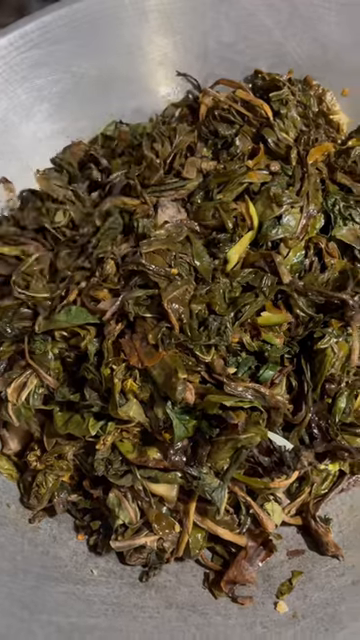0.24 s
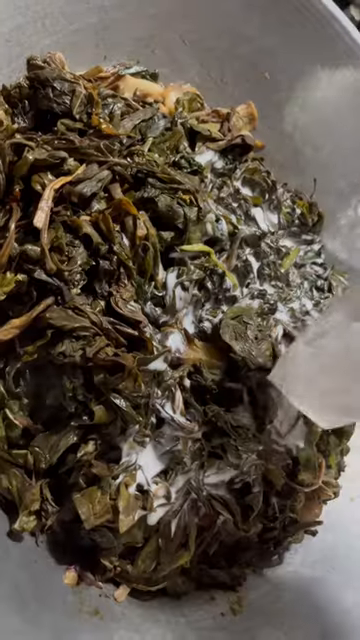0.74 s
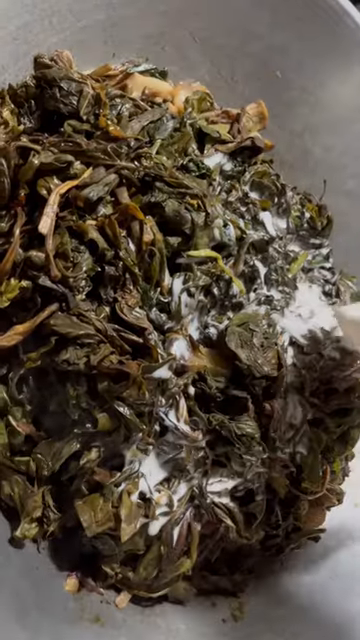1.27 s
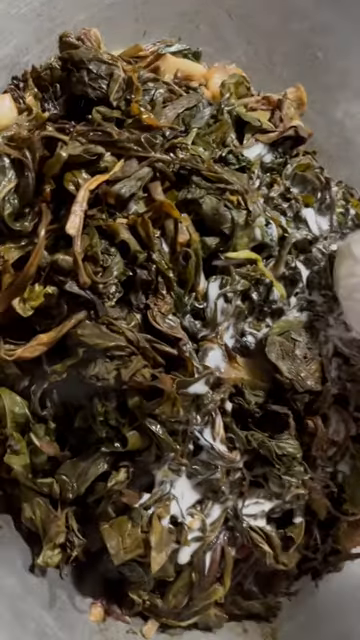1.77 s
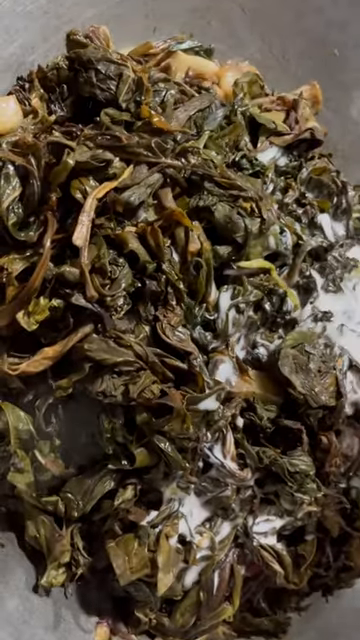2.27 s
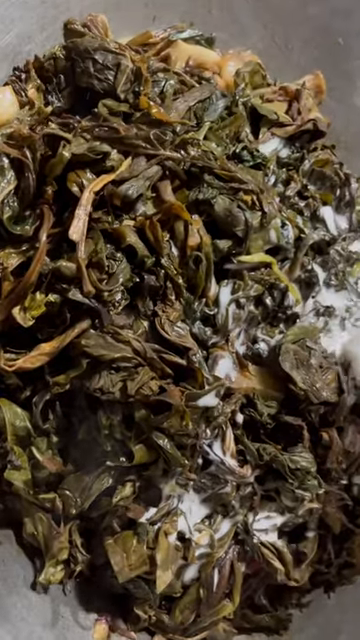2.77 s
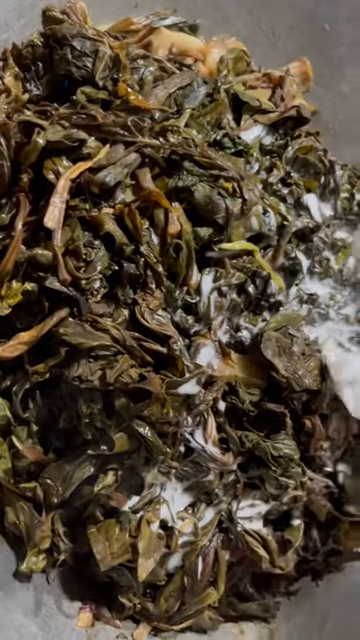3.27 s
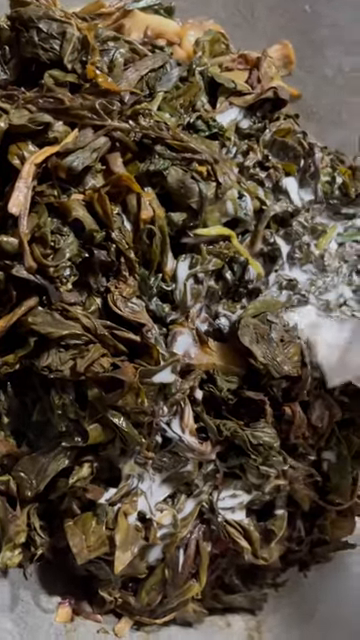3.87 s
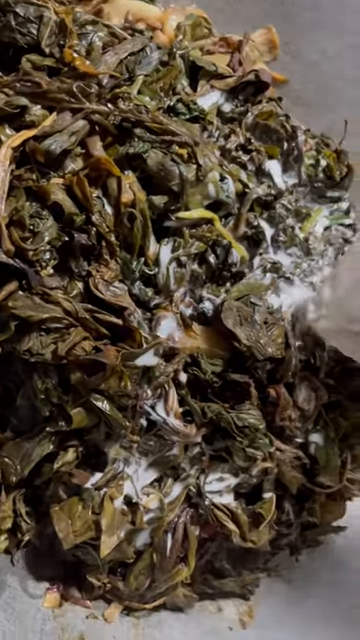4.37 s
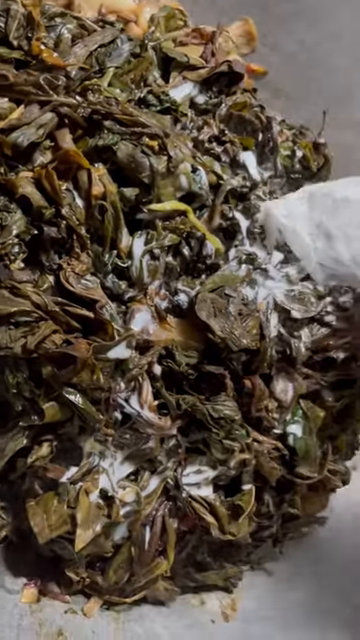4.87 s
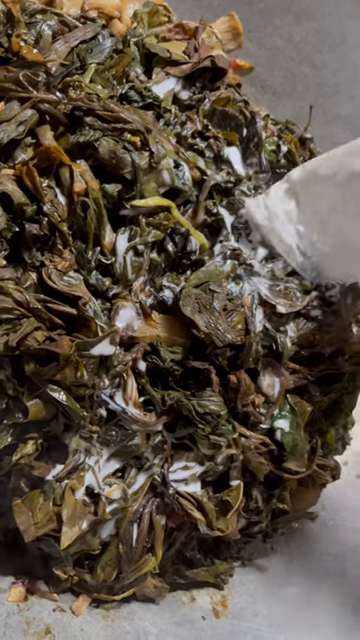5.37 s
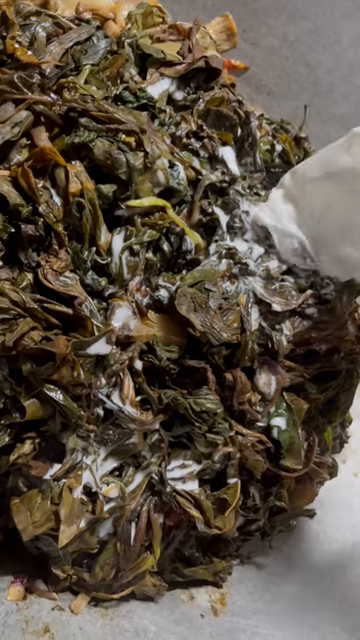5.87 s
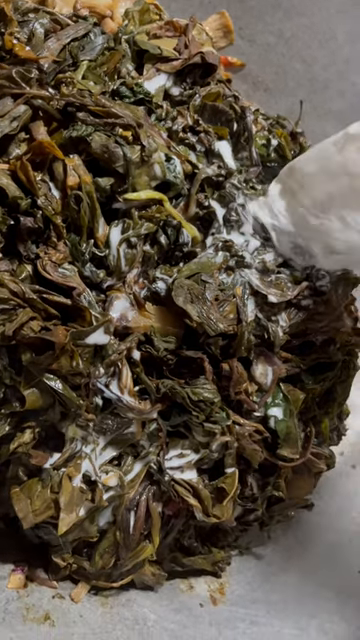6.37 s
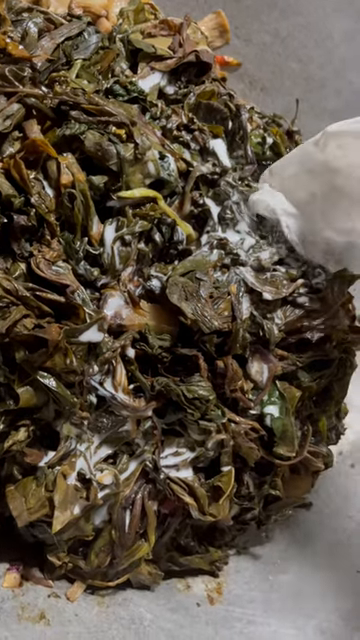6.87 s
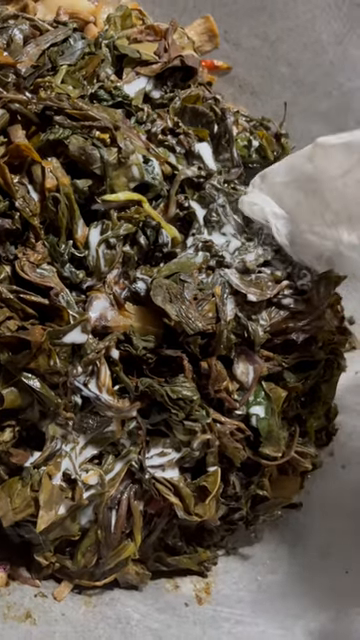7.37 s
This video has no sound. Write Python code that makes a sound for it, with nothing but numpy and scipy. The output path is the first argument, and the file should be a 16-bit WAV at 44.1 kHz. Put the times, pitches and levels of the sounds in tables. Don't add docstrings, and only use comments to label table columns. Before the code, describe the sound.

Wet leafy greens sizzle fiercely in a wide metal pan, a bright dense hiss full of crackles, sharp pops and a few faint utensil knocks.

```python
import sys
import numpy as np
from scipy import signal
from scipy.fft import rfft, irfft, next_fast_len
from scipy.io import wavfile

SR = 44100
rng = np.random.default_rng(int(sys.argv[2]) if len(sys.argv) > 2 else 0)


def gain_from_decibels(decibels):
    exponent = np.asarray(decibels, float) / 20
    return 10 ** exponent


def unload_wav(signal):
    wavfile.write(
        sys.argv[1],
        SR,
        np.round(np.clip(np.atleast_2d(signal).T, -1, 1) * 32767).astype(np.int16),
    )


N = 336483

# frequency_hz, level_db (per Hz)
STEAM_SPECTRUM = [(180, -45), (350, -38.5), (600, -32.5), (1100, -24.5), (1700, -17), (2500, -12.5),
                  (3200, -7), (4000, -5), (5000, -2), (6800, -0.5), (9000, -0.4), (11800, .5),
                  (13500, -0.5), (15500, -4)]
# centre_s, change_db, length_s
FLAME_DRAUGHTS = [
    (.4, -2, .4),
    (1.3, -5, 0.21),
    (1.9, -7, 0.2),
    (2.42, -4, .08),
    (2.92, -5, .16),
    (3.39, -6, 0.11),
    (5.1, -5.5, .3),
    (5.53, -7, 0.13),
    (6.44, -4, 0.19),
    (7.09, -4, .12),
]


def rms_one(x):
    return x / np.sqrt(np.mean(x ** 2) + 1e-20)


def at_hz(points, hz):
    point_hz, point_db = np.array(points)[:, 0], np.array(points)[:, 1]
    return gain_from_decibels(np.interp(np.log(hz + 1), np.log(point_hz), point_db))


def coloured(x, spectrum):
    size = next_fast_len(N + 4096)
    gain = at_hz(spectrum, np.fft.rfftfreq(size, 1 / SR))
    return irfft(rfft(x, size) * gain, size)[:N]


def filtered(x, order, hz, kind):
    return signal.sosfilt(signal.butter(order, hz, kind, fs=SR, output="sos"), x)


def drift(rate_hz):
    r = np.exp(-2 * np.pi * rate_hz / SR)
    noise = rng.standard_normal(N + SR)
    return rms_one(signal.lfilter([1], [1, -2 * r, r * r], noise)[SR:])


def swells(rows):
    t = np.arange(N) / SR
    return sum(db * np.exp(-(2 * (t - s) / length) ** 2) for s, db, length in rows)


def ring(clicks, hz, t60):
    r, w = gain_from_decibels(-60 / (t60 * SR)), 2 * np.pi * hz / SR
    return signal.lfilter([0, np.sin(w)], [1, -2 * r * np.cos(w), r * r], clicks + 1e-18)


def patchy(x, patch_db=1.01, per_s=13.0):
    size = next_fast_len(N)
    spectrum = rfft(x, size)
    band = (np.fft.rfftfreq(size, 1 / SR) // 700).astype(int)
    out = np.zeros(N)
    for k in range(23):
        out += gain_from_decibels(patch_db * drift(per_s)) * irfft(spectrum * (band == k), size)[:N]
    return out


def burst(centre_hz, echo, echo_s, tilt_hz=4500, mid_hz=9500):
    hz = np.fft.rfftfreq(1024, 1 / SR)
    tilt = np.exp((centre_hz - mid_hz) / tilt_hz * (np.maximum(hz, 4500) - mid_hz) / 4000)
    pulse = irfft(at_hz(STEAM_SPECTRUM, hz) * tilt * (hz < 15600))
    bounce = irfft(rfft(pulse) * echo * np.exp(-2j * np.pi * hz * echo_s))
    centred = np.roll(pulse + bounce, 512)
    return -centred / pulse[0] * np.hanning(1024)


def crackle(activity_db, per_s=3500, spread_db=3.5, size_db=-31, ceiling_db=-10.2):
    born = rng.random(N) < per_s * gain_from_decibels(activity_db) / SR
    sizes = gain_from_decibels(np.minimum(size_db + spread_db * rng.exponential(1, N), ceiling_db))
    dealt, out = rng.integers(0, 16, N), np.zeros(N)
    for k, (pitch, echo, lag) in enumerate(rng.random((16, 3))):
        centre_hz = 7200 + 4200 * (k + pitch) / 16
        shape = burst(centre_hz, 1.48 * (echo - .5), .0001 + 0.000673 * lag)
        out += signal.oaconvolve(born * sizes * (dealt == k), shape)[512:512 + N]
    return out


def fizz(per_s=1500, spread_db=0.0, cycles=53.0):
    born = rng.random(N) < per_s / SR
    sizes = gain_from_decibels(spread_db * np.minimum(rng.exponential(1, N), 4)) * born
    dealt, rings = rng.integers(0, 36, N), np.zeros(N)
    for k, hz in enumerate(np.geomspace(600, 15200, 36)):
        rings += hz * ring(sizes * (dealt == k), hz, cycles / hz)
    hollow = filtered(rings, 2, 4000, "high")
    return rms_one(coloured(rings * 0.27 + hollow, STEAM_SPECTRUM))


def sizzle():
    # time_s, level_db
    heat = [
        (0.0, -24.5),
        (3.06, -26),
        (3.23, -26),
        (3.8, -25),
        (6.5, -26.5),
        (6.65, -26),
        (7.59, -25.5),
        (7.63, -27),
    ]
    # centre_s, change_db, length_s
    juice_surges = [(.22, 0.2, .1), (.64, -0.5, 0.22), (.89, .5, 0.09), (1.13, 0.5, .14), (1.34, 0, 0.066),
                    (1.58, -0.8, 0.28), (1.72, 0.5, 0.063), (1.95, 0.5, 0.092), (2.12, -2, 0.047),
                    (2.36, 1, .12), (2.87, 0.3, .1), (3.08, 0.5, 0.065), (3.28, -0.8, 0.11),
                    (3.57, 0.8, .1), (3.9, .9, 0.05), (4.58, -0.5, 0.15), (4.8, 1, 0.05), (5.01, -2, .09),
                    (5.65, 0.2, 0.25), (6.05, -0.5, 0.056), (6.34, -1, .1), (6.5, -1, .07),
                    (6.72, 1.6, 0.09), (6.9, 0, 0.059), (7.0, -0.8, .1), (7.14, 0.9, .07), (7.32, 1.1, .07),
                    (7.55, -1.3, 0.073)]
    heat_s, heat_db = np.transpose(heat)
    level_db = np.interp(np.arange(N) / SR, heat_s, heat_db)
    surge_db = swells(juice_surges)
    spurts_db = 0.25 * drift(22) + .55 * drift(50)

    hiss = rms_one(patchy(coloured(rng.standard_normal(N), STEAM_SPECTRUM))) * gain_from_decibels(-29.5 + spurts_db)
    bed = hiss + crackle(2.4 * spurts_db + 1.1 * drift(25)) + gain_from_decibels(-36.5) * fizz()

    low = signal.sosfiltfilt(signal.butter(3, 4000, fs=SR, output="sos"), bed)
    wet = signal.sosfiltfilt(signal.butter(3, 1800, fs=SR, output="sos"), bed)
    mid_gain = gain_from_decibels(0.2 * surge_db + 1.26 * drift(16) + 0.12 * drift(2.3))
    wet_gain = gain_from_decibels(0.21 * surge_db + 0.17 * swells(FLAME_DRAUGHTS) + 0.58 * drift(4.5))
    return gain_from_decibels(level_db + surge_db + 27.5) * (bed - low + mid_gain * (low - wet) + wet_gain * wet)


def burner(start_db=-67.5, sag_db_per_s=0.48):
    # frequency_hz, level_db (per Hz)
    rumble = [(20, -25), (45, -18), (70, 1), (110, -2), (185, 3), (230, -0.5), (300, 1.5), (400, -1),
              (500, -3.5), (650, -1), (850, -1), (1300, -71)]
    # frequency_hz, rms_db
    hum = [(59.2, -83.5)]
    t = np.arange(N) / SR
    level_db = start_db - sag_db_per_s * t + swells(FLAME_DRAUGHTS)
    out = rms_one(coloured(rng.standard_normal(N), rumble)) * gain_from_decibels(level_db + 0.56 * drift(15))
    for hz, db in hum:
        out += np.sqrt(2) * gain_from_decibels(db) * np.sin(2 * np.pi * hz * t)
    return out


def through_pan(x):
    # frequency_hz, width_hz, boost_db
    pan_sheen = [(445, 18, 6), (648, 24, 5), (763, 22, 5), (1010, 80, 2), (1200, 60, 2.4), (2000, 200, 1.1),
                 (3150, 300, 1), (5130, 140, 2), (6900, 500, .7), (8300, 300, .7)]
    hz = np.geomspace(100, 20000, 3000)
    sheen_db = sum(db / (1 + (2 * (hz - peak_hz) / width) ** 2) for peak_hz, width, db in pan_sheen)
    return coloured(x, np.transpose([hz, sheen_db]))


def drops(per_s=60, size_db=-30, spread_db=4.0, fat_hz=5300, fat_spread_hz=220):
    # time_s, peak_db
    deep_bursts = [(0.1425, -21.2), (0.552, -17.1), (2.0697, -16.5), (2.3461, -21.8), (2.7033, -19.8),
                   (2.769, -19.5), (3.0827, -17.3), (3.3633, -17.4), (3.7947, -21.0), (3.8453, -20.7),
                   (3.9206, -16.3), (4.1198, -20.2), (4.1431, -18.3), (4.3229, -18.5), (4.3725, -20.0),
                   (4.4759, -19.6), (4.5452, -18.9), (4.8908, -21.4), (4.9537, -16), (5.1842, -16.4),
                   (5.4226, -21.2), (5.6581, -17.6), (5.9134, -19), (6.8656, -17.1), (6.9004, -16.8),
                   (7.3072, -19), (7.5901, -19.6)]
    out = np.zeros(N)
    for (s, db), chance in zip(deep_bursts, rng.standard_normal(len(deep_bursts))):
        click = np.zeros(200)
        click[0] = -gain_from_decibels(db + 4)
        at = round(s * SR) - 3
        out[at:at + 200] += ring(click, fat_hz + fat_spread_hz * chance, .0011)
    for hz in np.geomspace(2600, 6200, 6):
        born = rng.random(N) < per_s / 6 / SR
        tail_db = spread_db * np.minimum(rng.exponential(1, N), 2.5)
        sizes = gain_from_decibels(size_db + tail_db + 9 * np.log2(hz / 5000))
        out -= ring(born * sizes, hz, 10.0 / hz)
    return filtered(out + 1e-18, 2, 1500, "high")


def bumps():
    # time_s, peak_db, pitch_hz
    stove_bumps = [(0.073, -56, 301), (0.679, -58, 423), (1.459, -58, 148), (1.699, -61, 339),
                   (2.06, -57, 178), (2.259, -62, 196), (2.552, -56, 196), (2.619, -60, 272),
                   (3.879, -63, 417), (4.229, -61, 374), (4.729, -59, 339), (5.349, -59, 266),
                   (5.609, -63, 178), (5.999, -60, 256), (7.0, -63, 288)]
    out, t = np.zeros(N + 4000), np.arange(4000) / SR
    swell = (t / 0.0061) * np.exp(1 - t / 0.01)
    for (s, db, hz), chance in zip(stove_bumps, rng.standard_normal((len(stove_bumps), 4000))):
        at = round(s * SR)
        out[at:at + 4000] += gain_from_decibels(db - 11) * swell * rms_one(ring(chance, hz, .03))
    return out[:N]


def knocks():
    # time_s, peak_db, thud_db (relative), rattle_t60_s
    strikes = [
        (0.076, -53, -10, .05),
        (.644, -46, -22, 0.14),
        (.871, -44, -22, .04),
        (3.843, -46, -15, 0.04),
        (4.505, -47, -22, 0.032),
        (6.704, -39.5, -21, 0.29),
        (7.307, -48, -26, 0.026),
    ]
    # frequency_hz, level_db, t60_s
    pan_modes = [(800, -13, .02), (1025, -1, .022), (1265, -4, .02), (1540, 0, .03), (1800, -4, .02),
                 (2019, 0, .025), (2330, -2, .02), (2600, -4, .02)]
    out, t = np.zeros(N), np.arange(4000) / SR
    contact, thud = np.zeros(N + 4000), np.zeros(N + 4000)
    for (s, db, thud_db, t60), chance in zip(strikes, rng.standard_normal((len(strikes), 4000))):
        at, touches = round(s * SR), gain_from_decibels(-60 * t / t60) * chance
        contact[at:at + 4000] += gain_from_decibels(db - 22.0) * touches
        thud[at:at + 4000] += gain_from_decibels(db + thud_db + 19) * touches
    for hz, level_db, t60 in pan_modes:
        out += gain_from_decibels(level_db) * ring(contact[:N], hz, t60)
    return filtered(out, 2, 750, "high") + filtered(thud[:N] + 1e-18, 2, [120, 650], "band")


def loud_pops():
    # time_s, peak_db, centre_hz
    lone_pops = [(0.0792, -6.9, 8500), (0.1735, -5.9, 8600), (0.2098, -6.9, 10400), (0.3593, -8.5, 11100),
                 (0.6728, -5.4, 9800), (1.0963, -6.4, 10400), (1.2509, -6.6, 9100), (1.3442, -5.0, 10700),
                 (1.5632, -6.8, 9100), (1.8, -6.4, 9400), (2.0679, -6.3, 11100), (2.2283, -5.5, 9700),
                 (2.4661, -5.5, 11300), (3.0318, -5.9, 10000), (3.0827, -5.1, 7800), (3.5491, -3.3, 8600),
                 (3.586, -3.9, 8800), (3.9021, -6.2, 8700), (3.9206, -6.2, 6500), (4.4113, -5.6, 8800),
                 (4.4756, -6.0, 9600), (4.5216, -7.5, 9300), (4.9293, -5.2, 7400), (4.9537, -6.2, 8100),
                 (5.1842, -4.8, 8700), (5.8186, -4.0, 10200), (5.9134, -8.0, 7600), (6.4112, -7.4, 9700),
                 (7.1422, -7.7, 10600), (7.3072, -8, 7100)]
    out = np.zeros(N + 1024)
    for (s, db, hz), (echo, lag) in zip(lone_pops, rng.random((len(lone_pops), 2))):
        at = round(s * SR)
        pop = gain_from_decibels(db - .2) * burst(hz, .7 * (echo - .5), .0001 + .0004 * lag)
        out[at:at + 1024] += pop[:N + 1024 - at]
    return out[512:512 + N]


def scene():
    mono = through_pan(sizzle() + burner()) + loud_pops() + drops() + knocks() + bumps()
    return np.stack([mono, mono])


def top_cut(x):
    return signal.sosfilt(signal.butter(12, 16780, fs=SR, output="sos"), x)


def record(dry):
    size = next_fast_len(N + 4096)
    passed = np.fft.rfftfreq(size, 1 / SR) < 15530
    cut = irfft(rfft(dry, size) * passed, size)[:, :N]
    return top_cut(cut)


dry = scene()
out = record(dry)
unload_wav(out)
```